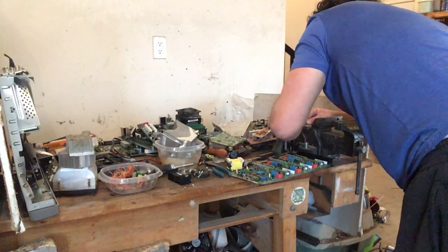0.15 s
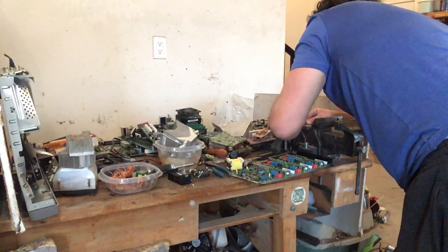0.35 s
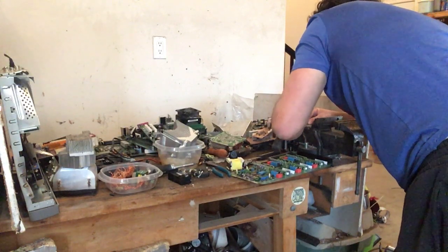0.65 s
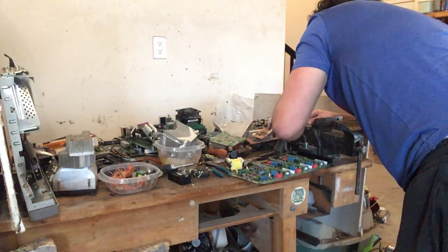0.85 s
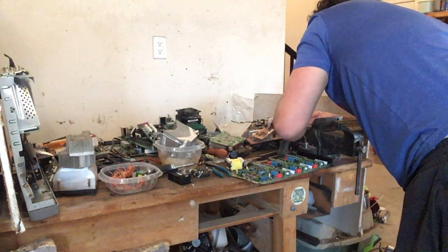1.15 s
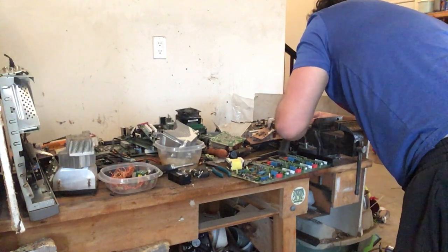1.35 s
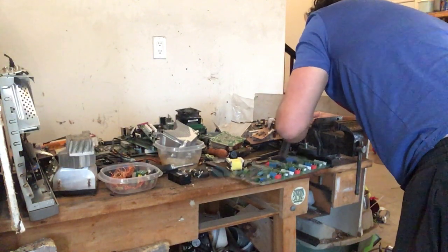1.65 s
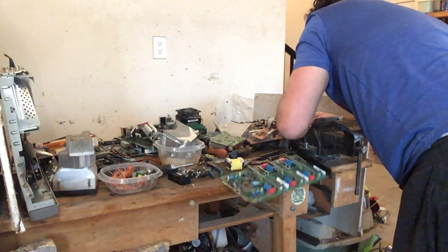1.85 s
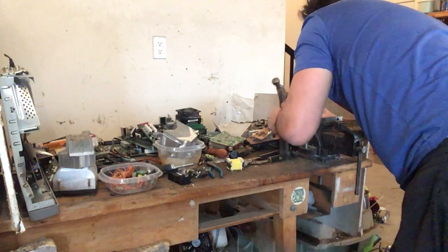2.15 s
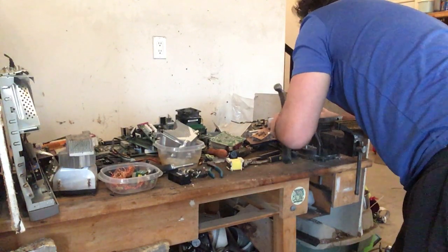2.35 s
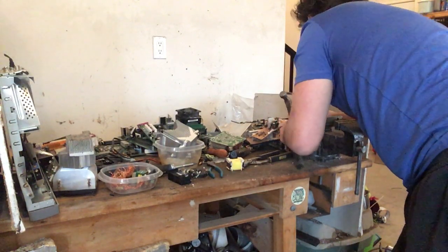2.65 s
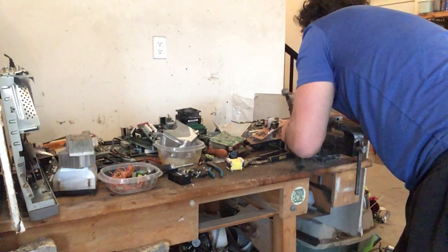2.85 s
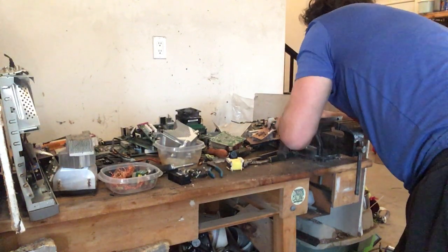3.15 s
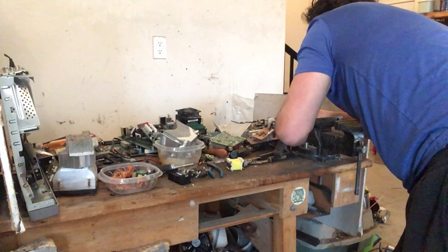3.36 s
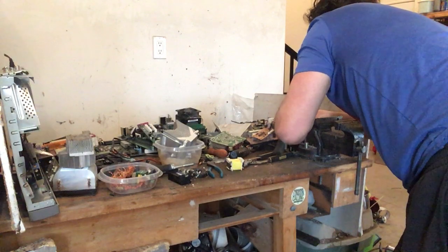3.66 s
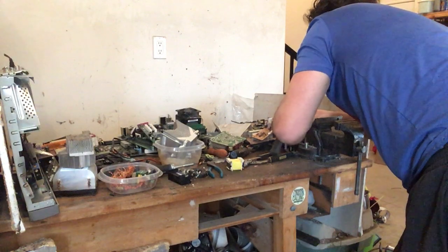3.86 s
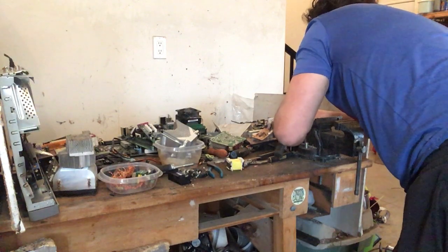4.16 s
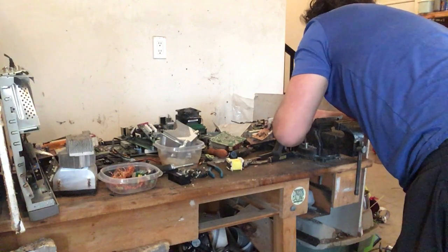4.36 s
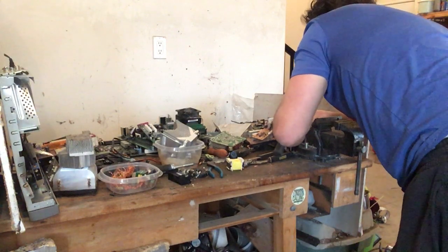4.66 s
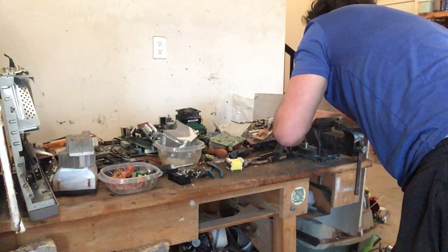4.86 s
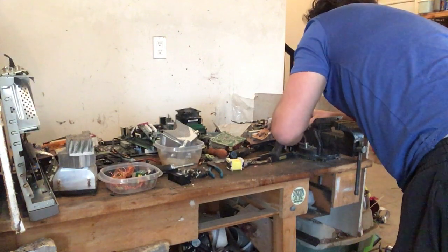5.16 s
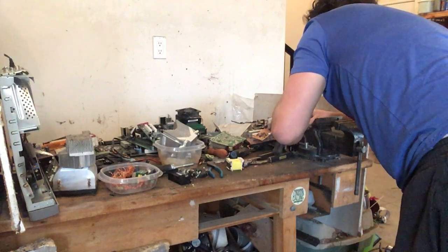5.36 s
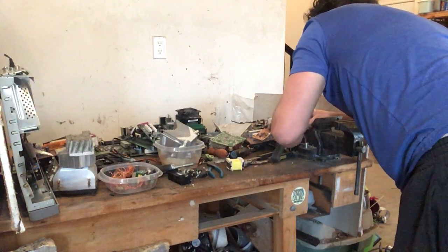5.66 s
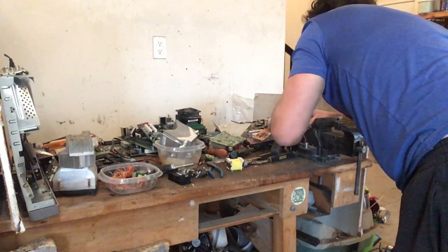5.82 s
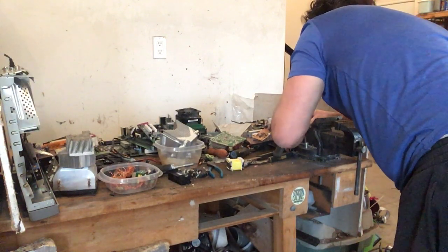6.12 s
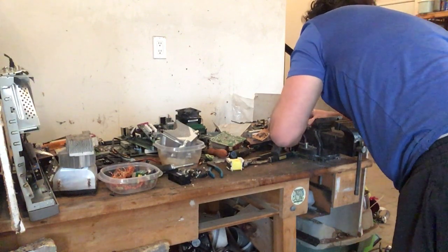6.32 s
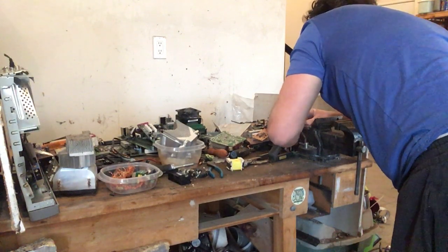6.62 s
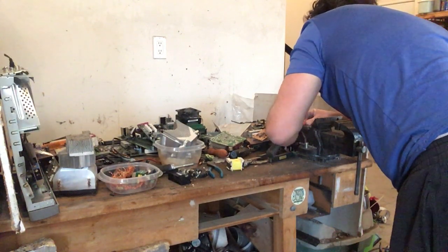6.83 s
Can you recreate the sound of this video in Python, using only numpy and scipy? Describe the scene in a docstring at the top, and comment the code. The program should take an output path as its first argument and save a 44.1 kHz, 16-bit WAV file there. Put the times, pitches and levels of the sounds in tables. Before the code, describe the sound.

Brisk, slightly uneven hammer taps on plastic and wood, with bright steel ring and loose parts ticking. They pause briefly while a circuit board slips off and hits the floor in a noisy cluster of snaps and flat slaps, chatters and skids to a stop. Hammering starts again, a little lighter at first and varying in force. Small hard-walled room with short reverberation and very quiet background.

```python
"""A small steel hammer taps a plastic relay box off a circuit board on a wooden bench, about 4.4 blows/s.
Each blow cracks plastic, rings steel and, ms later, knocks box and bench; scrap rings, loose parts rattle.
In a pause the board slips off, crashes to the floor, tinkles, chatters and scrapes to rest; hammering resumes.
Struck modes and dense micro-clicks make the impacts; modulated noise makes the chatter and scrape.
A bare little room answers everything over a faint hush."""
import sys
import numpy as np
from scipy import signal
from scipy.fft import rfft, irfft, next_fast_len
from scipy.io import wavfile

SR = 44100
rng = np.random.default_rng(int(sys.argv[2]) if len(sys.argv) > 2 else 0)


def wav_record(signal):
    """Record a signal, one row per channel, as 16-bit PCM in the file named by sys.argv[1]."""
    frames = np.transpose(np.atleast_2d(signal))
    bounded = np.clip(frames, -1, 1)
    # unit amplitude maps onto the largest positive 16-bit level
    quanta = np.round(bounded * 32767).astype(np.int16)
    wavfile.write(sys.argv[1], SR, quanta)


N = 308233
T = np.arange(SR) / SR  # 1 s time axis of one impact

# hammer blows: [t/s, force re usual blow/dB, plastic crack level/dB]
BLOWS = [(0.0, -1.4, -36), (0.2341, 2, -27), (0.4805, -4, -33), (0.7723, -2.5, -37), (0.9974, -0.9, -46),
         (1.2156, 1.5, -38.5), (1.4409, 3, -34.5), (1.6748, -1.1, -37.5), (3.0912, -4.5, -36.5),
         (3.3126, -3.5, -35), (3.532, 0.3, -43), (3.763, -9, -33.5), (4.04, -1.9, -48), (4.275, -6, -43.5),
         (4.5091, -1, -40), (4.738, 1, -38), (4.963, 1, -38.5), (5.194, 1.5, -39), (5.4273, 2.5, -40),
         (5.676, -8.5, -38.5), (5.9731, -14.5, -44), (6.201, -0.8, -42.5), (6.4202, -0.1, -41.5),
         (6.6371, -1.4, -36), (6.856, 1.5, -36)]
# plastic splinters: [t/s, fizz level/dB]
SPLINTERS = [(0.2333, -36), (0.481, -40), (3.761, -34.5), (5.675, -37)]


def undb(db):
    """dB to amplitude."""
    return 10 ** (np.asarray(db) / 20)


def on_log(hz, points):
    """Interpolate (f/Hz, value) points on a log-frequency axis."""
    f, value = np.transpose(points)
    return np.interp(np.log(np.maximum(hz, 1)), np.log(f), value)


def colour(x, points):
    """Filter x by a (f/Hz, level/dB) curve; rms 1."""
    gain = undb(on_log(np.fft.rfftfreq(len(x), 1 / SR), points))
    y = irfft(rfft(x) * gain, len(x))
    return y / np.std(y)


def uneven(spread_db, size):
    """Dense micro-clicks of uneven strength."""
    boost_db = spread_db * np.minimum(rng.exponential(size=size), 2 * np.pi)
    return rng.standard_normal(size) * undb(boost_db)


def fade(rise_s, t60_s):
    """Swell while the contact lasts, then die away."""
    return (1 - np.exp(-T / rise_s)) * undb(-60 * T / t60_s)


def unit(x):
    """Scale to rms 1 over the first 25 ms."""
    return x / np.std(x[:SR // 40])


def partials(modes, rise_s):
    """One decaying complex line per mode, each with a random phase."""
    lines = []
    for hz, db, t60_s in modes:
        line = np.exp(2j * np.pi * (hz * T + rng.random()))
        lines.append(undb(db) * fade(rise_s, t60_s) * line)
    return np.array(lines)


def struck(lines, scatter_db, detune):
    """Each blow lands on another spot under another grip: new mode weights, slightly new pitch."""
    weights = undb(scatter_db * rng.standard_normal(len(lines)))
    sound = weights @ lines.imag
    pitch_ratio = 1 + detune * rng.uniform(-0.65, 1)
    return unit(np.interp(T * pitch_ratio, T, sound))


def burst(points, envelope, spread_db):
    """A blow dispersed into dense micro-clicks: scattered in time, smooth in spectrum."""
    half_envelope = np.sqrt(envelope)  # applied before and after shaping
    clicks = rfft(uneven(spread_db, size=SR) * half_envelope)
    phases = clicks / np.abs(clicks)
    gain = undb(on_log(np.fft.rfftfreq(SR, 1 / SR), points))
    return unit(irfft(phases * gain, SR) * half_envelope)


def add(out, s, x):
    """Mix x in at time s."""
    i = max(int(s * SR), 0)
    out[i:i + len(x)] += x[:max(len(out) - i, 0)]


def hammering(box_lag_s=0.00239, bench_lag_s=0.003, drive_lag_s=0.003):
    """Plastic cracks and steel rings at the touch; ms later the blow drives home into box and bench."""
    # modes of bench, box, hand-damped steel tools, hammer head: [f/Hz, relative level/dB, t60/s]
    bench_modes = [(108.3, -11.5, 0.23), (183.3, -11.5, 0.31), (208.5, 3.5, 0.071), (250, -5.5, 0.15),
                   (276, 4.5, 0.06), (325.8, -3.5, 0.068), (408.7, -9.5, 0.14), (461.6, -11.5, 0.16),
                   (658, -10, 0.1), (620.7, 0.5, 0.054), (720.1, -9.5, 0.17)]
    box_modes = [(1383, -1, .09), (1445, -5, .05), (1500, -4, .05), (1560, 0, .08), (1712, -12, .06)]
    steel_modes = [(1903, -1, .11), (2306, -3, .1), (2479, -11, .07), (2662, -1, .07), (2898, 1.5, .08),
                   (3192, 3, .07), (3660, -7, .07), (3830, -7, .07), (4826, -11, .08), (5692, -14, .08),
                   (6338, -14, .12)]
    head_modes = [(8400, -23, 0.083), (7820, -14, 0.2), (7840, 43, 0.05)]
    # dense vibration of bench, box, steel; crack of the plastic: [f/Hz, relative level/dB]
    wood = [(30, -35), (55, -49), (100, -12), (150, -15), (195, -8.5), (290, 4.5), (450, -2.5), (700, -0.5),
            (950, -10), (1400, -9.5), (4000, -30)]
    shell = [(500, -73), (1000, -13), (1250, -6.5), (1500, 6), (1800, -8.5), (2200, -9), (4000, -67)]
    clink = [(1200, -27), (2100, 6), (3000, 5.5), (4000, 6), (5000, -1), (6800, -7), (8800, -6.5),
             (10500, -47), (16000, -57)]
    crack = [(500, 5.5), (2000, 0.5), (4500, 1.5), (7000, -4), (9500, -0.5), (10700, -4.5), (12300, -2.5),
             (14500, -7), (16000, -15)]
    # hold on the box before/after the board drops:
    # [from t/s, box clack level/dB, steel ring level/dB, hammer ping level/dB], levels at a usual blow
    grips = [(0, -29, -33.5, -48.5), (2.25, -31.5, -32, -41.5)]
    knock_db = -26.5  # bench at a usual blow
    # dB per dB of force: a harder blow is shorter, so the high modes gain most
    clack_growth, ring_growth, ping_growth = 0.92, 1.12, 2.1
    cushion_db = -33.5  # a splinter this loud halves the steel's swing
    steel_db = -1  # pure steel tone within the ring

    out = np.zeros(N)
    bench, box = partials(bench_modes, 0.003), partials(box_modes, 0.0014)
    steel, head = partials(steel_modes, 0.002), partials(head_modes, 0.0084)
    wood_fade, shell_fade = fade(0.0032, 0.076), fade(0.00096, 0.037)
    clink_fade, touch_fade = fade(0.0015, 0.069), fade(0.00071, 0.029)
    crack_fade = fade(0.0001, 0.005) + undb(-8.0) * fade(0.0003, 0.26)
    for s, force_db, crack_db in BLOWS:
        _, clack_db, ring_db, ping_db = grips[int(s > grips[1][0])]
        splinter = sum(undb(db - cushion_db) for at, db in SPLINTERS if abs(at - s) < 0.05)
        ring = undb(ring_db + ring_growth * force_db) / (1 + splinter ** 2)

        bench_tone = struck(bench, scatter_db=0.5, detune=0.029)
        knock = unit(bench_tone + undb(-4.5) * burst(wood, wood_fade, spread_db=0.5))
        box_tone = struck(box, scatter_db=10.0, detune=0.012)
        clack = unit(box_tone + undb(7.5) * burst(shell, shell_fade, spread_db=2.5))
        steel_tone = struck(steel, scatter_db=1.5, detune=0.003)
        touch = burst(clink, touch_fade, spread_db=2.5)
        drive = burst(clink, clink_fade, spread_db=0.0)
        ping = struck(head, scatter_db=1.5, detune=0.002)

        add(out, s + bench_lag_s, undb(knock_db + force_db) * knock)
        add(out, s + box_lag_s, undb(clack_db + clack_growth * force_db) * clack)
        add(out, s, ring * undb(steel_db) * steel_tone)
        add(out, s, ring * undb(-8.5) * touch)
        add(out, s + drive_lag_s, ring * undb(0.5) * drive)
        add(out, s, undb(ping_db + ping_growth * force_db) * ping)
        add(out, s, undb(crack_db) * burst(crack, crack_fade, spread_db=3))
    return out


def ringing_scrap():
    """Metal scrap on the bench rings in sympathy with each blow, in proportion to its force."""
    # scrap modes: [f/Hz, relative level/dB, t60/s]
    scrap_modes = [(724, 1, .35), (1367, 0, .45), (1547, -1, .35), (1914, -4, .45), (3838, -1, .5),
                   (3924, 2, .5), (4189, 2, .7)]
    usual_db = -47
    out, scrap = np.zeros(N), partials(scrap_modes, 0.003)
    for s, force_db, _ in BLOWS:
        add(out, s, undb(usual_db + force_db) * struck(scrap, scatter_db=1.5, detune=0.001))
    return out


def faint_hush():
    """Steady coloured noise at rms -60 dB."""
    # hush of the room: [f/Hz, relative level/dB]
    hush_spectrum = [(25, -12), (60, -9.5), (200, 0), (600, -10), (2000, -16), (6000, -25), (16000, -39)]
    return undb(-60) * colour(rng.standard_normal(N), hush_spectrum)


def room(x, wet_db=-3, build_s=0.00083, gap_s=0.004):
    """Diffuse reflections build up after a gap, treble dying first; their pattern shifts as the worker moves."""
    # reverberation: [f/Hz, t60/s]
    room_t60 = [(80, 0.62), (250, 0.55), (700, 0.67), (1600, 0.63), (4000, 0.66), (8000, 0.47),
                (14000, 0.42)]
    size, hop = next_fast_len(N + SR), SR // 4
    hz, noise = np.fft.rfftfreq(size, 1 / SR), rfft(rng.standard_normal(size))
    bands = []
    for centre, _ in room_t60:
        band_gain = on_log(hz, [(f, f == centre) for f, _ in room_t60])  # triangle on log f
        bands.append(irfft(noise * band_gain, size))
    bands = np.array(bands)
    fades = np.array([fade(build_s, t60_s) for _, t60_s in room_t60])

    # overlapping pieces, each with its own stretch of the noise as tail
    padded, wet = np.pad(x, (hop, 2 * hop)), np.zeros(N + hop)
    window = signal.windows.cosine(2 * hop)
    for i in range(0, N + hop, hop):
        stretch = bands.take(np.arange(i, i + SR), axis=1, mode="wrap")
        tail = np.sum(stretch * fades, axis=0)
        piece = padded[i:i + 2 * hop] * window
        add(wet, i / SR + gap_s, signal.fftconvolve(piece, tail / np.linalg.norm(tail)))
    return x + undb(wet_db) * wet[hop:]


def splintering():
    """Splintering plastic gives a thin, high fizz of very uneven micro-clicks."""
    # fizz: [f/Hz, relative level/dB]
    fizz = [(8000, -22), (10500, -10), (11800, 2), (14200, -4), (16000, -20)]
    out = np.zeros(N)
    for s, db in SPLINTERS:
        add(out, s, undb(db) * burst(fizz, fade(0.0003, 0.043), spread_db=12.5))
    return out


def hopping_parts():
    """Loose parts land hard on the bench and bounce once, 3 dB louder."""
    # landings: [t/s, first level/dB]
    hops = [(0.494, -31.5), (1.647, -44.5), (1.715, -37), (2.214, -69), (3.788, -40), (5.700, -40.5),
            (6.003, -44), (6.446, -43.5)]
    # rattle: [f/Hz, relative level/dB]
    rattle = [(60, 5), (300, 7.5), (1500, 2.5), (3300, 1), (5500, -4), (8000, -11.5), (13000, -11),
              (16000, -24)]
    out = np.zeros(N)
    for s, db in hops:
        add(out, s, undb(db) * burst(rattle, fade(0.00072, 0.063), spread_db=4.5))
        bounce = burst(rattle, fade(0.00045, 0.054), spread_db=3.5)
        add(out, s + rng.uniform(0.0056, 0.014), undb(db + 3.0) * bounce)
    return out


def rebounding_piece(flight_s=0.026):
    """A loose piece jumps with the blow and drops back with a bright tick."""
    # jumps: [t of blow/s, tick level/dB]
    rebounds = [(0.7733, -41), (3.3106, -41.5), (3.534, -36), (4.04, -49), (4.2753, -41), (4.51, -35.5),
                (4.963, -40), (6.4218, -37.5)]
    # tick: [f/Hz, relative level/dB]
    tick = [(1000, -33), (4000, 9), (7500, -9), (10500, -4.5), (13500, -2), (16000, -9)]
    out = np.zeros(N)
    for s, db in rebounds:
        add(out, s + flight_s, undb(db) * burst(tick, fade(0.003, 0.05), spread_db=5))
    return out


def falling_board():
    """Edge and face hit the floor in turn: a flat strike booms the panel, an edge-on one snaps."""
    # floor strikes: [t/s, level/dB, angle (0 flat, 1 edge-on), burst t60/s]
    strikes = [(2.2486, -22, 0.78, 0.18), (2.339, -25.5, 0.42, 0.086), (2.352, -20, 0.43, 0.076),
               (2.367, -22.5, 0.45, 0.045), (2.394, -19, 0.35, 0.07), (2.401, -28, .55, .043),
               (2.413, -21, 0.72, 0.017), (2.589, -32, 0.52, 0.047), (2.645, -31.5, 0.47, 0.075),
               (2.698, -25.5, 0.54, .027), (2.780, -31.5, 0.47, .031), (2.895, -28.5, 0.72, 0.065)]
    # modes of the loose board: [f/Hz, relative level/dB, t60/s]
    board_modes = [(726, 5.5, 0.067), (1002, 4, 0.14), (1180, -15, 0.12), (1385, 3, 0.17), (1810, 5, 0.065),
                   (2766, 12, 0.034), (2980, -16, 0.2)]
    # dense vibration, flat and edge-on: [f/Hz, relative level/dB]
    panel = [(40, -44), (90, 0), (150, -38), (230, -2), (400, -3), (760, 0), (1350, 2.5), (2000, -4.5),
             (2800, 0), (4000, -19), (9000, -31)]
    snap_spectrum = [(600, -37), (2000, -17), (3500, 0.5), (6200, 2.5), (9500, -0.5), (12000, 1.5),
                     (14500, -1), (16000, -16)]
    edge_db = -0.5  # gain of the snap
    out, board = np.zeros(N), partials(board_modes, 0.00091)
    for s, db, angle, t60_s in strikes:
        edge = np.clip(angle, 0, 1)
        boom = burst(panel, fade(0.0018, t60_s), spread_db=2.5)
        body = boom + undb(-6.5) * struck(board, scatter_db=2.5, detune=0.0117)
        snap = undb(edge_db) * burst(snap_spectrum, fade(0.0011, t60_s), spread_db=2.5)
        add(out, s, undb(db) * ((1 - edge) * body + edge * snap))
    return out


def tinkling_parts():
    """Metal parts on the board ring, each as one decaying sine."""
    # rings: [t/s, f/Hz, level before a common +0.5 dB/dB, t60/s]
    tinkles = [(2.2495, 6560, -38, .12), (2.321, 7650, -39, .06), (2.394, 1385, -30, .4),
               (2.699, 9030, -34, .04)]
    out = np.zeros(N)
    for s, hz, db, t60_s in tinkles:
        tone = np.sin(2 * np.pi * hz * T) * fade(0.0004, t60_s)
        add(out, s, undb(db + 0.5) * unit(tone))
    return out


def skidding_board(scrape_width_hz=125):
    """On the floor the board rocks, chatters and scrapes to a halt by many contacts and stick-slip."""
    # edge drags: [t of peak/s, level/dB, swell and fade time constant/s]
    scrapes = [(2.369, -24, .014), (2.73, -36, 0.058), (2.987, -38, 0.024)]
    # clatter; grit under the edge: [f/Hz, relative level/dB]
    clatter_spectrum = [(40, -45), (90, 8), (140, 0.5), (220, 15.5), (480, 0), (850, -11), (2000, -6),
                        (3000, 1), (4500, -9), (9000, -9.5), (13000, -17), (16000, -19)]
    grit_spectrum = [(200, -27), (900, -5), (3500, 2), (13000, -18)]
    start_s, attack_s, hold_s, fall_db_per_s, chatter_db = 2.25, 0.017, 0.52, 112, -39
    # stick-slip rate at first touch, its rise, grit gain
    scrape_hz, rise_hz_per_s, grit_db = 715, 300, -3

    t = np.arange(N) / SR
    age = np.maximum(t - start_s, 0)
    fall_db = fall_db_per_s * np.maximum(age - hold_s, 0)
    rocking = np.minimum(age / attack_s, 1) * undb(chatter_db - fall_db)
    dragging = sum(undb(db) * np.exp(-np.abs(t - s) / swell_s) for s, db, swell_s in scrapes)
    dragging = dragging * (age > 0)

    # about 220 tiny contacts/s, each with a short decay
    strength = undb(5.2 * np.minimum(rng.exponential(size=N), np.pi))
    contacts = (rng.random(N) < 220 / SR) * strength
    chatter = signal.fftconvolve(contacts, fade(0.0009, 0.083))[:N]
    chatter /= np.sqrt(np.mean(chatter ** 2))
    clatter = chatter * colour(uneven(spread_db=1.0, size=N), clatter_spectrum)

    # the edge sticks and slips at a ragged, rising rate
    lowpass = signal.butter(2, scrape_width_hz, fs=SR, output="sos")
    ragged = signal.sosfilt(lowpass, rng.standard_normal(N))
    cycles = np.cumsum(scrape_hz + rise_hz_per_s * age) / SR
    scrape = ragged / np.std(ragged) * np.sin(2 * np.pi * cycles) * np.sqrt(2)
    grit = undb(grit_db) * chatter * colour(uneven(spread_db=2.5, size=N), grit_spectrum)
    return rocking * clatter + dragging * (scrape + grit)


def scene():
    """Hammer, loose parts and board in the room, over a faint hush."""
    bench_sounds = hammering() + ringing_scrap() + splintering() + hopping_parts() + rebounding_piece()
    floor_sounds = falling_board() + tinkling_parts() + skidding_board()
    return (room(bench_sounds + floor_sounds) + faint_hush())[None]


def record(dry, low_hz=48, top_hz=16000):
    """The microphone drops the deep bass; a steep lowpass cuts the top."""
    highpass = signal.butter(N=4, Wn=low_hz, btype="high", fs=SR, output="sos")
    thin = signal.sosfilt(highpass, dry)
    return signal.sosfilt(signal.ellip(10, 0.2, 80, top_hz, fs=SR, output="sos"), thin)


dry = scene()
out = record(dry)
wav_record(out)
```